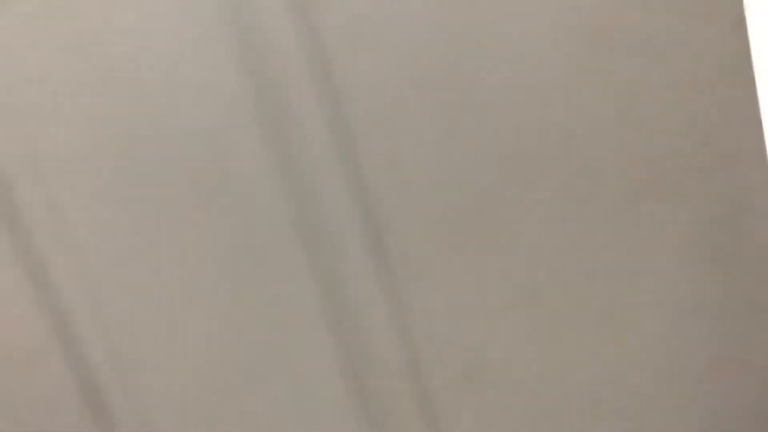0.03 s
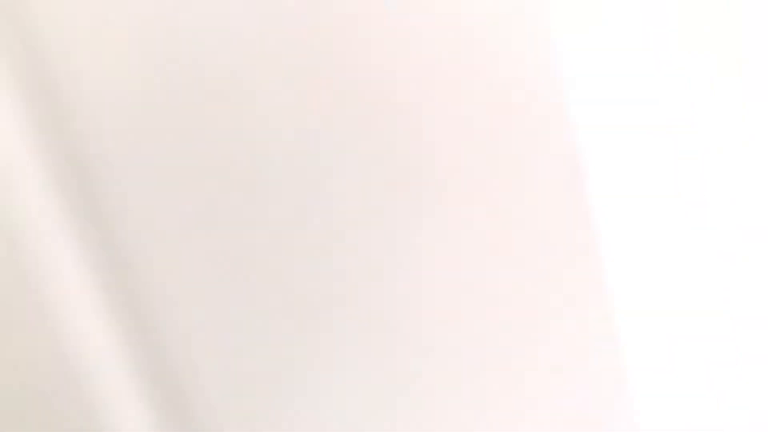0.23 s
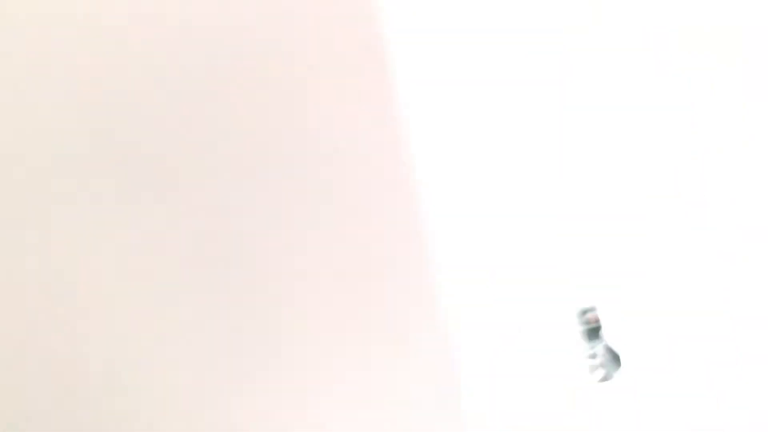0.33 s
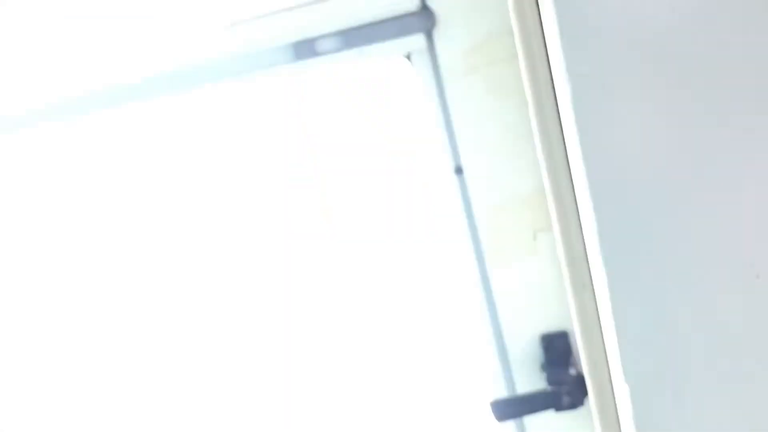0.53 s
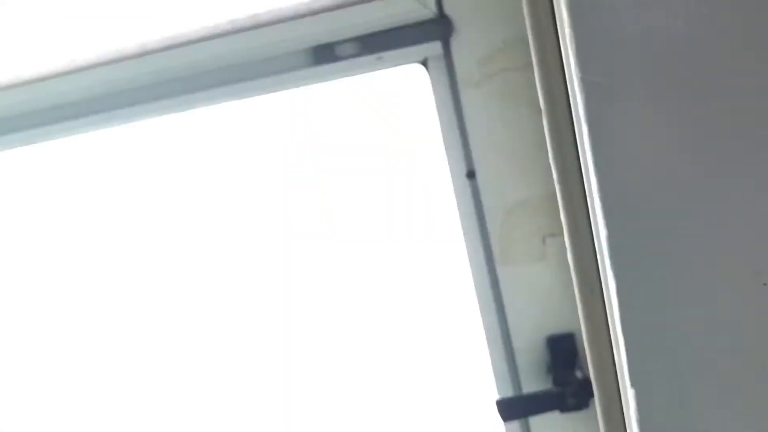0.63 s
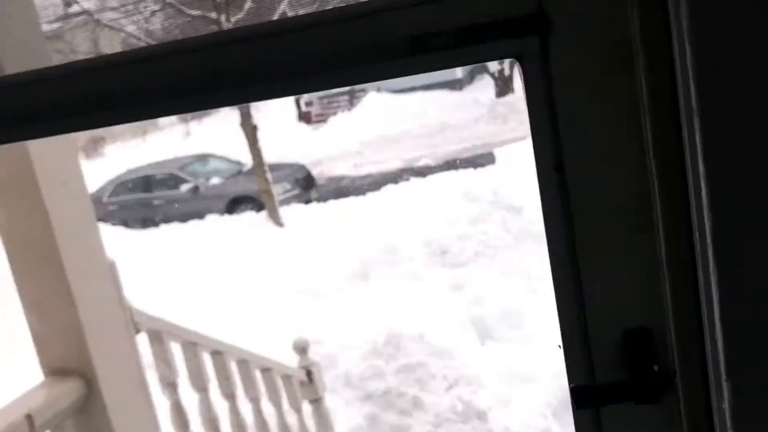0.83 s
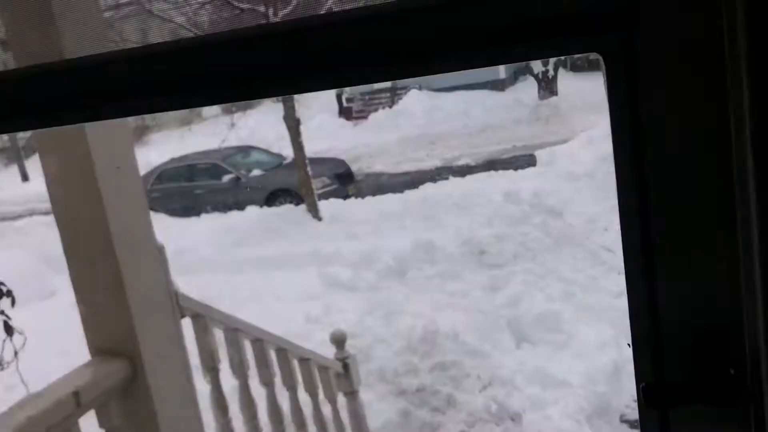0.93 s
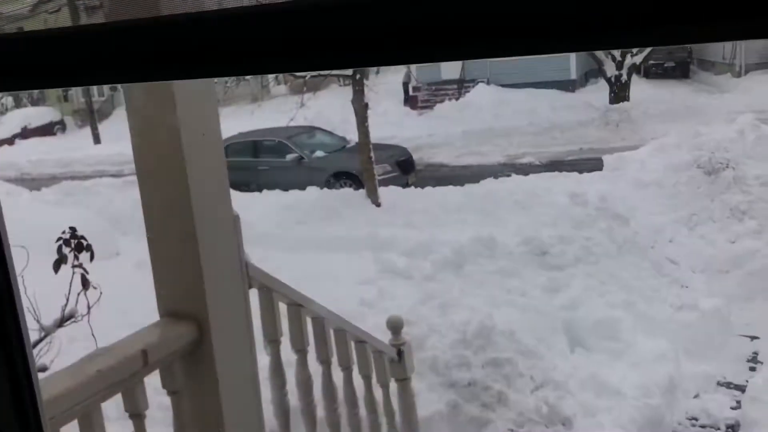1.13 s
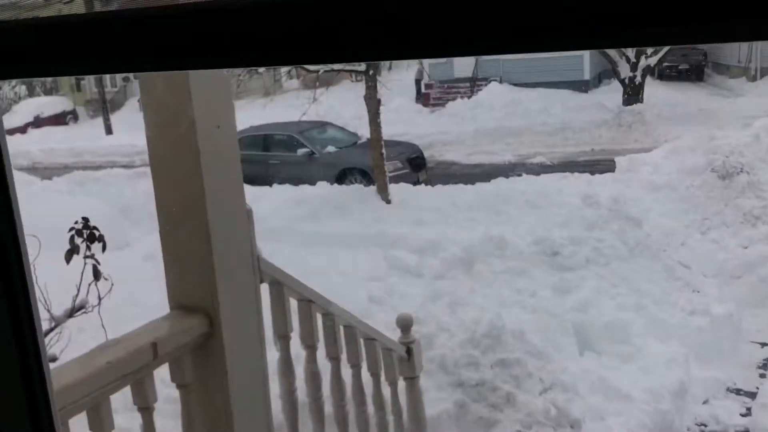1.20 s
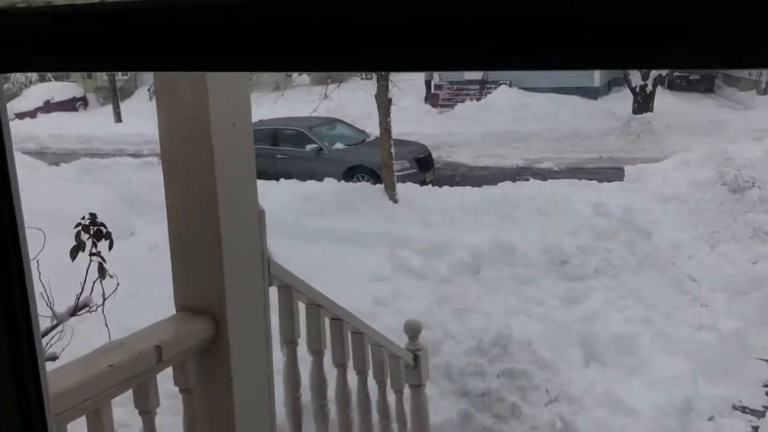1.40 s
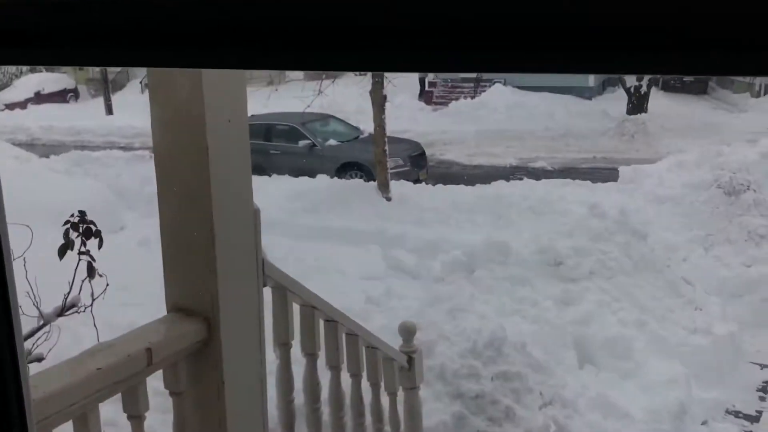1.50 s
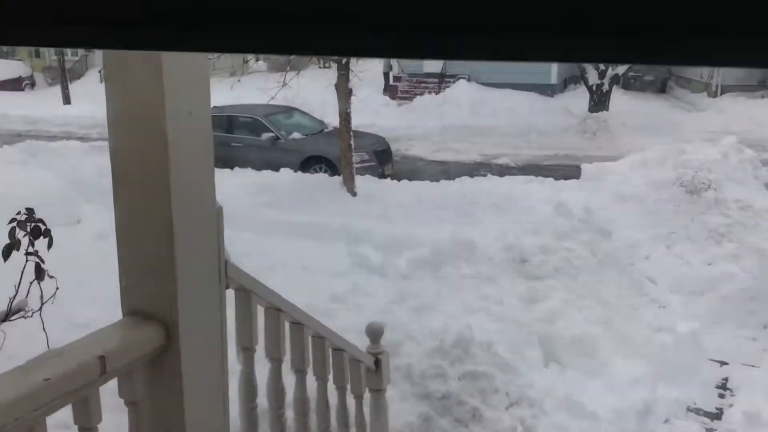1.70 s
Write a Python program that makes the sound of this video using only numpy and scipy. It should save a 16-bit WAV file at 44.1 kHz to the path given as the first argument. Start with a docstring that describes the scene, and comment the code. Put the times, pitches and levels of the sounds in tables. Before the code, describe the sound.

In a small, slightly echoing entryway, a door squeaks and scrapes open, shuddering in its frame hard enough to overload the nearby microphone. Then come quiet footsteps, wooden taps, a clink and the click of a storm door latch.

```python
"""A house door is pulled open close by and judders in its frame, loud enough to overload the microphone.
Each knock makes the door panel boom and its loose metal parts rattle. The handle squeaks as dry metal
rubs, and the rubber weather seal scrapes free in many tiny slips. Soft steps, wooden taps and a clink
follow, then the storm door's latch clicks. A small entrance hall adds its echo and a low hush."""
import sys
import numpy as np
from scipy import signal
from scipy.fft import rfft, irfft
from scipy.io import wavfile
from scipy.ndimage import uniform_filter1d

SR = 44100
rng = np.random.default_rng(int(sys.argv[2]) if len(sys.argv) > 2 else 0)


def generate_wav(signal):
    """Clip the signal to [-1, 1] and save it as 16-bit WAV at the path in sys.argv[1]."""
    frames = np.transpose(np.atleast_2d(signal))
    scaled = np.clip(frames, -1, 1) * 32767
    pcm = np.round(scaled).astype(np.int16)
    wavfile.write(sys.argv[1], SR, pcm)


N = 77175

# Tone of the house's hush, the seal's scrape and its hiss. Each row: frequency in Hz, relative dB.
HUSH_COLOUR = [(20, -29), (45, 4), (85, -1), (150, 0), (210, -12.5), (280, -10.5), (550, -21.5),
               (1200, -21.5), (2500, -27), (4100, -29), (5000, -36), (6200, -30.5), (7500, -41.5),
               (9300, -38), (10400, -46), (12500, -40.5), (15500, -48)]
SCRAPE_COLOUR = [(60, -18), (280, 13), (550, -4), (950, 3), (1400, 2), (1900, -1), (2600, -8), (4200, -10),
                 (7000, -16), (11000, -24.5), (15500, -30)]
HISS_COLOUR = [(1500, 1), (4200, 4), (8500, -2.5), (10500, -5), (15500, -8)]
# Loudness of the hush and the scrape. Each row: time in seconds, level in dB.
HUSH_LEVEL = [(0, -29.5), (.7, -36), (1.05, -34.5), (1.27, -36.5), (1.5, -35), (1.75, -32.5)]
SCRAPE_LEVEL = [(0, -27), (.03, -29), (.075, -47), (.14, -28), (.186, -41.5), (.203, -20.5), (.24, -22.5),
                (.252, -23), (.268, -16), (.292, -18), (.42, -15.5), (.485, -24), (.525, -29), (.58, -19),
                (.605, -44), (.7, -36.5), (.82, -77)]
# Noisy ringing of the hall and struck things. Each row: frequency in Hz, relative dB, seconds to fade.
HALL_RING = [(149, -6, 0.81), (372, 9, 0.22), (1180, -3.5, 0.34), (5170, -2, 0.22), (15000, -5.5, 0.22)]
WOOD_RING = [(70.3, 1, 0.99), (295, 9, 0.19), (645, 1.5, 0.13), (1270, -2.5, 0.15), (1490, -2, 0.046),
             (2750, -14, 0.14), (5000, -19, 0.044), (8700, -35, 0.095), (15000, -57, 0.073)]
METAL_RING = [(600, -12, 0.093), (1250, 3, 0.11), (2500, -1.5, 0.11), (2750, -23, 0.061), (3800, 6, 0.089),
              (5160, -11, 0.095), (9500, -17, 0.07), (15500, -23, .065)]
LATCH_RING = [(126, -7, 0.16), (470, -33, 0.095), (690, 1, 0.14), (1050, -8.5, 0.23), (1197, 3.5, 0.21),
              (1450, 4.5, 0.077), (1800, -5, 0.14), (2580, -10, 0.17), (3900, -11.5, 0.088),
              (8700, -15, 0.13), (10900, -22, 0.12), (15700, -23, 0.1)]
DOOR_RING = [(60.6, -41, 0.13), (276, -3, 0.41), (520, -2.5, 0.32), (960, 0, 0.17), (1840, -2.5, 0.16),
             (4100, -6, 0.13), (4900, -11, 0.11), (5240, -8.5, 0.11), (9900, -10.5, 0.084),
             (10400, -17.5, 0.1), (15500, -16.5, 0.11)]
# Clear tones of struck things. Each row: pitch in Hz, relative dB, seconds to fade.
FLOOR_TONES = [(81.4, 7.5, 0.16), (104.2, 10, 0.081), (146.6, -12.5, 0.39)]
WOOD_TONES = [(242, -4.5, 0.22), (880, -16.5, 0.17), (1612, -10.5, 0.069), (1681, -10, 0.07),
              (2090, -20, 0.046)]
METAL_TONES = [(1320, -11, 0.17), (3780, 3, 0.022), (4040, -7, 0.14), (5350, -25, 0.046),
               (7900, -33, 0.055), (9330, -21, 0.067), (9250, -17, 0.066), (10300, -27, .07),
               (11500, -17, 0.06), (13130, -22, 0.078), (13430, -21, 0.07)]
LATCH_TONES = [(694, -16, 0.094), (758, -17, 0.15), (1200, -15, 0.25), (1310, -8, 0.12), (1477, -1.5, 0.12),
               (1640, -16.5, 0.16)]
LOOSE_PART_TONES = [(587.4, -34, 0.27), (717, -20.5, 0.44), (868, -24, 0.32), (974, -14.5, 0.17),
                    (1057.4, -8.5, 0.098), (1527, -11.5, 0.17), (1840, -22.5, 0.18), (2264, -13, 0.13),
                    (3480, -18.5, 0.094), (5770, -16, 0.057)]
PANEL_TONES = [(43.3, -15.5, 1), (86, -1, 0.75), (105, -3.5, 0.4), (133.7, 0.5, 0.39), (160.1, 2, 0.34),
               (261.5, -5, 0.35), (284.4, 0.5, 0.31), (352, -6.5, 0.23), (446.4, -12.5, 0.25)]
# Footfalls, a clink and the door's boom as it rebounds against its frame. Each row: start in seconds, level in
# dB.
STEPS = [(0.031, -25), (0.746, -24), (0.854, -17.5), (0.946, -23.5), (.975, -22), (1.404, -22),
         (1.475, -25)]
CLINKS = [(0.9154, -20)]
THUDS = [(.358, -5.5)]
# Wood and latch hits. Each row: start in seconds, level in dB, added brightness in dB per octave.
TAPS = [(0.8406, -22, 1.35), (0.9036, -29.5, 6.5), (1.0096, -24.5, -1.1), (1.078, -43.5, 11),
        (1.275, -41, 3), (1.332, -33.5, 5), (1.394, -31, 3), (1.678, -36.5, 7), (1.742, -36, 5.5)]
LATCH_HITS = [(1.5557, -21, 2.8), (1.5605, -17, -0.5), (1.571, -23.5, 0)]
# Low bumps and the seal's peep. Each row: start and length in seconds, pitch in Hz, level in dB.
BUMPS = [(0.018, 0.071, 55, -45), (0.45, 0.06, 49, -33), (0.881, 0.05, 65.7, -15.5),
         (1.108, 0.0365, 63, -15.5), (1.526, 0.055, 57, -26)]
PEEPS = [(0.196, .042, 11100, -42)]
# Fast drags of the seal and of sleeves. Each row: start and length in seconds, level in dB.
HISSES = [(0.194, 0.0041, -30.5), (0.238, 0.033, -22.5), (0.453, 0.056, -26.5), (1.102, 0.076, -49)]
# The handle's squeak. Each row: time in seconds, pitch in Hz, relative level in dB.
SQUEAK = [(.025, 5860, -46), (.033, 5915, -32), (.052, 6070, -23.5), (.06, 6100, -25.5), (.085, 6150, -38),
          (.103, 6256, -26.5), (.117, 6330, -26.5), (.13, 6335, -37), (.145, 6325, -54), (.186, 6325, -53)]
# The door hitting its frame. Each row: start in seconds, rattle in dB, added brightness in dB per
# octave, treble limit in Hz, boom in dB, pitch of the struck part in Hz, its level in dB.
KNOCKS = [(0.014, -35.5, -2, 5940, -24.5, 299, -22), (0.086, -27.5, -3.3, 13000, -28, 316, -20.5),
          (0.203, -20, -4.5, 9000, -15, 103.6, -3), (0.2974, -12, 0, 7100, -16.5, 1906, -10),
          (0.327, -2.5, 0.5, 16000, -10, 1550, -7.5), (0.3856, -4.5, 0.9, 16000, -7.5, 1005, -8),
          (0.4349, -8.5, -1, 16000, -10, 3397, -13), (0.5045, -14.5, 4, 5250, -44, 2277, -15),
          (0.5317, -20, 1.5, 13000, -46, 3280, -27), (.5497, -9, -0.1, 12600, -17.5, 1069, -20.5),
          (0.629, -25.5, 1.5, 5500, -40, 3050, -30), (0.7226, -35, -1.5, 7000, -32, 1043, -40)]

RING_SAMPLES = int(0.8 * SR)
PITCH_WOBBLE = 0.005  # share of the pitch, for squeak and peep


def amp(db):
    """Turns decibels into a gain."""
    return 10 ** (np.asarray(db) / 20)


def unit(x):
    """Scales a signal to an average (rms) level of 1."""
    return x / np.sqrt(np.mean(x ** 2) + 1e-20)


def curve(points, column=1):
    """Joins timed points with straight lines, one value per sample."""
    rows = np.array(points)
    return np.interp(np.arange(N) / SR, rows[:, 0], rows[:, column])


def add(mix, start, sound):
    """Mixes a sound in at a start time in seconds."""
    part = mix[max(round(start * SR), 0):][:len(sound)]
    part += sound[:len(part)]


def colour(x, points, tilt_db=0):
    """Shapes the lows and highs of a sound; a positive tilt makes it brighter."""
    rows = np.array(points)
    octave = np.log2(np.fft.rfftfreq(len(x), 1 / SR) + 1)
    db = np.interp(octave, np.log2(rows[:, 0]), rows[:, 1])
    db += tilt_db * np.maximum(octave, np.log2(rows[0, 0]))
    return unit(irfft(rfft(x) * amp(db) * (octave > 4), len(x)))  # nothing below 15 Hz


def wander(size):
    """A smooth random wobble that changes over size samples."""
    return unit(uniform_filter1d(uniform_filter1d(rng.standard_normal(N), size), size))


def arch(seconds):
    """A smooth swell and fade."""
    return np.sin(np.pi * np.arange(0, seconds, 1 / SR) / seconds)


def soften(x, rise_s):
    """Lets a sound build up."""
    return x * (1 - np.exp(-np.arange(len(x)) / SR / rise_s))


def fade(seconds):
    """Dies away by 60 dB in the given time."""
    return 1000 ** (-np.arange(RING_SAMPLES) / SR / seconds)


def tones(table):
    """A struck thing's clear tones, each dying at its own speed."""
    t = np.arange(RING_SAMPLES) / SR
    return sum(amp(db) * fade(life) * np.sin(2 * np.pi * hz * t) for hz, db, life in table)


def ring(table, tilt_db=0):
    """Countless close tones: a burst of noise whose bands die at their own speeds."""
    spectrum = rfft(colour(rng.choice([-1., 1.], RING_SAMPLES), table, tilt_db))
    octave = np.log2(np.fft.rfftfreq(RING_SAMPLES, 1 / SR) + 1)
    hz, _, lives = np.transpose(table)
    out = np.zeros(RING_SAMPLES)
    for pick, life in zip(np.eye(len(hz)), lives):
        band = np.interp(octave, np.log2(hz), pick)
        out += irfft(spectrum * band) * fade(life)
    return soften(out, rise_s=0.00015)


def hush():
    """The house rumbles low and hisses faintly."""
    return amp(curve(HUSH_LEVEL)) * colour(rng.standard_normal(N), HUSH_COLOUR)


def hall_echo(sound, level_db=-17):
    """The walls throw the sound back; the low notes last longest."""
    echo = ring(HALL_RING)
    return amp(level_db) * signal.fftconvolve(sound, echo / np.linalg.norm(echo))


def low_bumps():
    """Short, dull low bumps from handling and from air pushed by the swinging door."""
    out = np.zeros(N)
    for start, length, hz, db in BUMPS:
        from_middle = np.arange(0, length, 1 / SR) - length / 2
        add(out, start, -amp(db) * arch(length) * np.cos(2 * np.pi * hz * from_middle))
    return out


def steps():
    """Soft feet push on the floorboards, which thud."""
    out = np.zeros(N)
    thud = soften(tones(FLOOR_TONES), rise_s=0.014)
    for start, db in STEPS:
        add(out, start, amp(db) * thud)
    return out


def taps_and_clink():
    """Light hits ring briefly: dull on wood, bright on metal."""
    out = np.zeros(N)
    for start, db, tilt_db in TAPS:
        add(out, start, amp(db) * (ring(WOOD_RING, tilt_db) + tones(WOOD_TONES)))
    for start, db in CLINKS:
        add(out, start, amp(db) * (ring(METAL_RING) + tones(METAL_TONES)))
    return out


def latch():
    """The storm door's latch touches, snaps in and bounces."""
    out = np.zeros(N)
    for start, db, tilt_db in LATCH_HITS:
        add(out, start, amp(db) * (ring(LATCH_RING, tilt_db) + tones(LATCH_TONES)))
    return out


def handle_squeak(octave_db=-18.5, echo_s=0.0085, echo_db=-9):
    """Dry metal sings a rising note with a weak octave; its echo off the door makes it waver."""
    t = np.arange(N) / SR
    pitch = curve(SQUEAK) * (1 + PITCH_WOBBLE * wander(size=60))
    phase = 2 * np.pi * np.cumsum(pitch) / SR
    flicker_db = 1.2 * wander(size=150)
    rubbing = (t > SQUEAK[0][0]) & (t < SQUEAK[-1][0])
    level = 1.218 * amp(curve(SQUEAK, 2) + flicker_db) * rubbing
    out = level * (np.sin(phase) + amp(octave_db) * np.sin(2 * phase))
    add(out, echo_s, amp(echo_db) * out)
    return out


def seal_peep():
    """Sticking rubber sings briefly, very high, as it first lets go."""
    out = np.zeros(N)
    for start, length, hz, db in PEEPS:
        swell = arch(length)
        pitch = hz * (1 + PITCH_WOBBLE * wander(size=60)[:len(swell)])
        add(out, start, amp(db) * swell * np.sin(2 * np.pi * np.cumsum(pitch) / SR))
    return out


def seal_scrape(slips_per_s=1200, slip_share=0.39):
    """The seal drags over the frame in tiny slips; it and the sleeves hiss where they move fast."""
    slips = (rng.random(N) < slips_per_s / SR) * rng.choice([-1, 1], N)
    friction = slip_share * unit(slips) + (1 - slip_share) * rng.standard_normal(N)
    hiss_level = np.zeros(N)
    for start, length, db in HISSES:
        add(hiss_level, start, amp(db) * arch(length))
    scrape = amp(curve(SCRAPE_LEVEL)) * colour(friction, SCRAPE_COLOUR)
    return scrape + hiss_level * colour(friction, HISS_COLOUR)


def clack(hz, count=12, spread=0.1):
    """One struck part sounds a bunch of close tones that build up and die fast."""
    t = np.arange(RING_SAMPLES) / SR
    pitches = hz * (1 + spread * rng.uniform(-0.96, 1, (count, 1)))
    bunch = np.sin(2 * np.pi * (pitches * t + rng.random((count, 1)))).sum(0)
    life = 0.075 * (1000 / hz) ** 0.23  # higher notes die sooner
    level = soften(fade(life), rise_s=0.85 / hz)
    return unit(bunch * level) * np.sqrt(np.mean(level ** 2))


def rattle(tilt_db, treble_hz, chatter_db=2.2, detune=0.008, spread_db=2.5):
    """Loose parts bounce, breaking the door's ring into grains, and ring differently at each blow."""
    crack = ring(DOOR_RING, tilt_db)
    bounce_db = chatter_db * soften(wander(size=40), rise_s=0.005)
    grains = crack * unit(amp(bounce_db))[:len(crack)]
    parts = [(hz * (1 + detune * rng.standard_normal()), db + spread_db * rng.standard_normal(), life)
             for hz, db, life in LOOSE_PART_TONES]
    muffle = signal.butter(2, treble_hz, fs=SR, output="sos")  # softer contact, less treble
    return signal.sosfilt(muffle, grains + tones(parts))


def boom(spread=0.022):
    """The panel rings low. Its grip in the frame changes at each blow, shifting the top tones most."""
    top_hz = PANEL_TONES[-1][0]
    shifted = [(hz * (1 + spread * hz / top_hz * rng.standard_normal()), db, life)
               for hz, db, life in PANEL_TONES]
    return soften(tones(shifted), rise_s=0.016)


def door_judder():
    """Each knock on the frame rattles, booms and clacks; the door booms again as it rebounds against the frame."""
    out = np.zeros(N)
    for start, rattle_db, tilt_db, treble_hz, boom_db, clack_hz, clack_db in KNOCKS:
        add(out, start, amp(rattle_db) * rattle(tilt_db, treble_hz))
        add(out, start, amp(boom_db) * boom())
        add(out, start, amp(clack_db) * clack(clack_hz))
    for start, db in THUDS:
        add(out, start, amp(db) * boom())
    return out


def scene():
    """Mixes everything to one channel; steps, bumps and hush get no echo."""
    out = handle_squeak() + seal_peep() + seal_scrape() + door_judder() + taps_and_clink() + latch()
    add(out, start=0.012, sound=hall_echo(out))
    return (out + steps() + low_bumps() + hush())[None]


def record(dry):
    """The loudest knocks overload the microphone and flatten; then the highest treble is cut."""
    overloaded = np.clip(dry, -1, 1)
    treble_cut = signal.firwin(401, cutoff=15900, window=("kaiser", 8), fs=SR)
    return signal.oaconvolve(overloaded, treble_cut[None], "same")


dry = scene()
out = record(dry)
generate_wav(out)
```